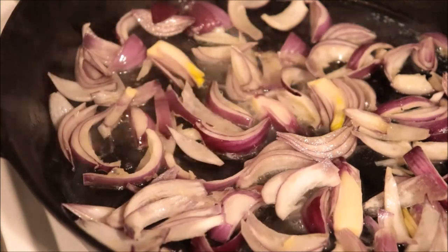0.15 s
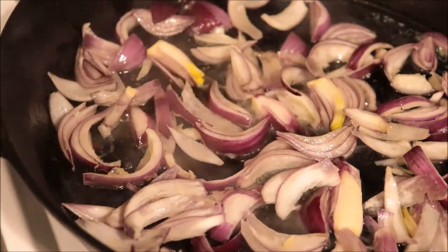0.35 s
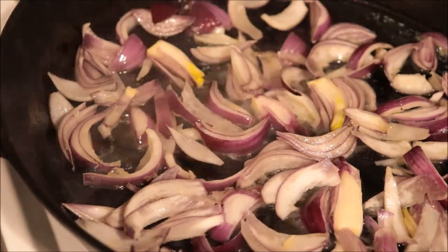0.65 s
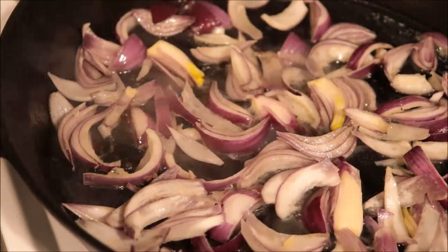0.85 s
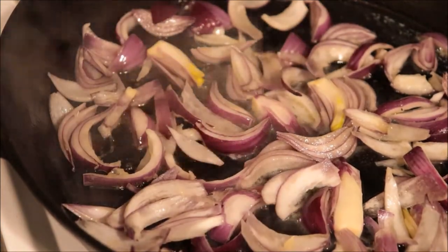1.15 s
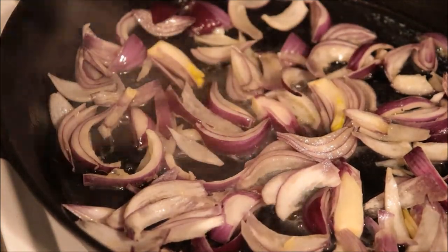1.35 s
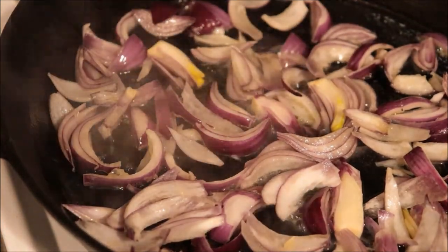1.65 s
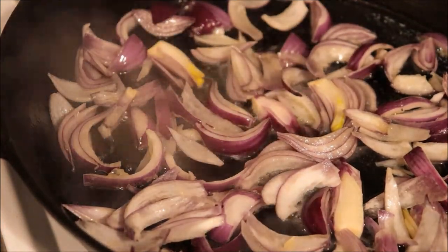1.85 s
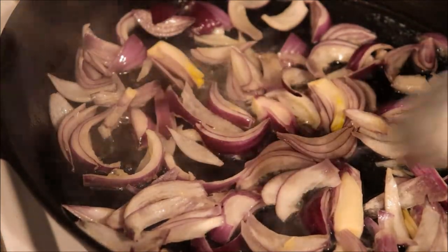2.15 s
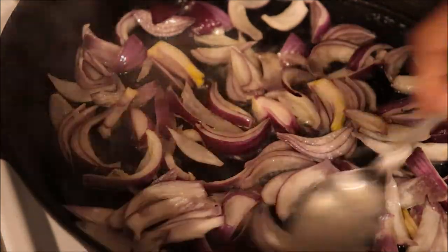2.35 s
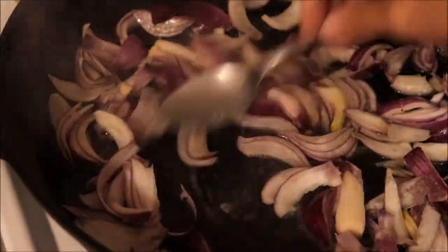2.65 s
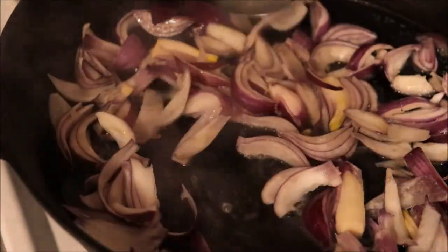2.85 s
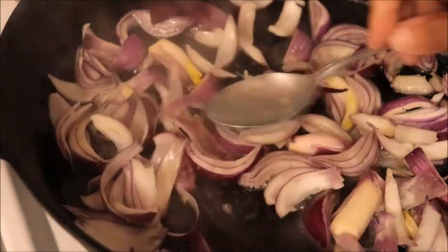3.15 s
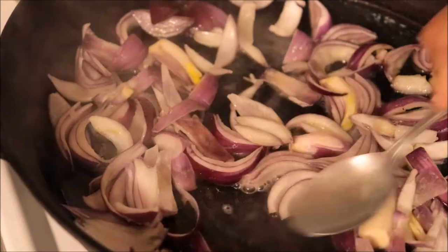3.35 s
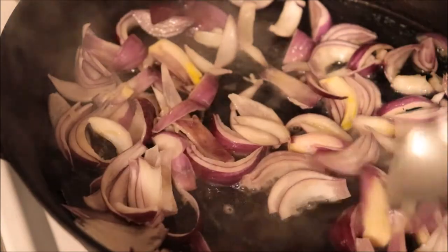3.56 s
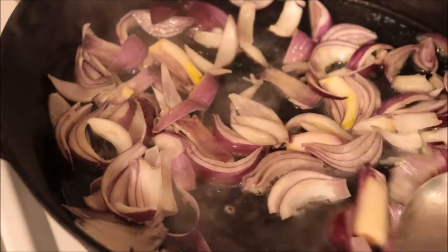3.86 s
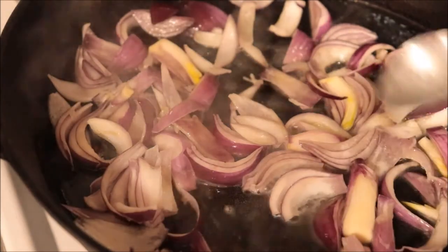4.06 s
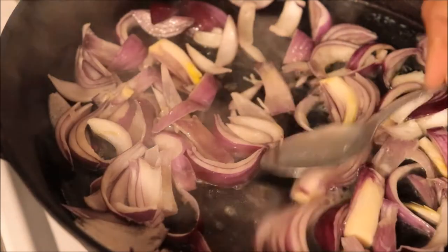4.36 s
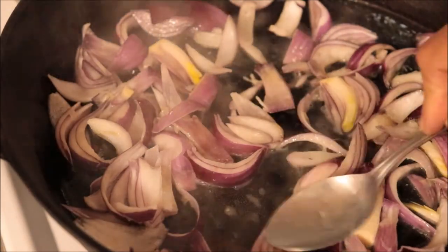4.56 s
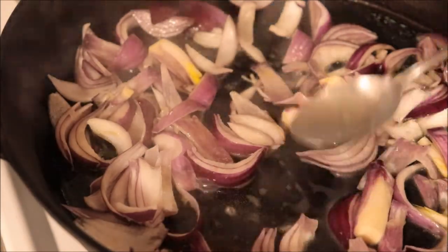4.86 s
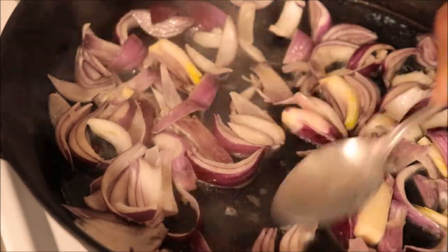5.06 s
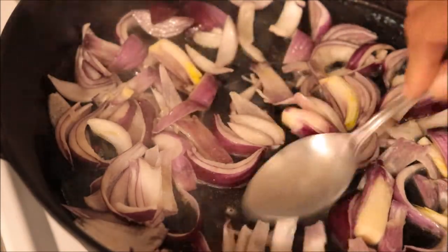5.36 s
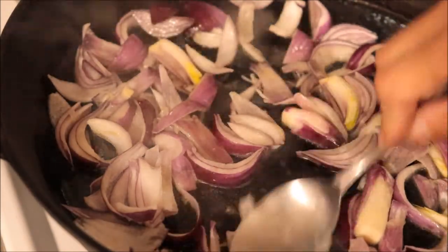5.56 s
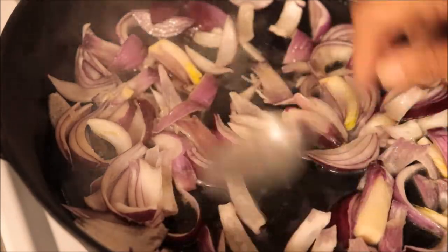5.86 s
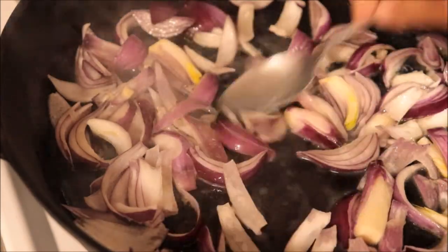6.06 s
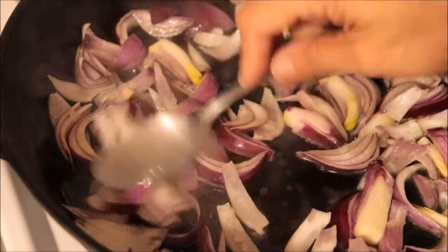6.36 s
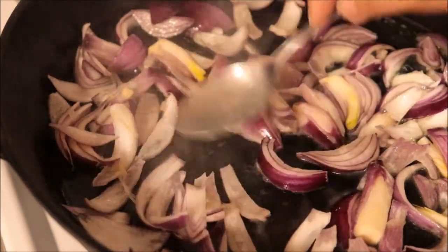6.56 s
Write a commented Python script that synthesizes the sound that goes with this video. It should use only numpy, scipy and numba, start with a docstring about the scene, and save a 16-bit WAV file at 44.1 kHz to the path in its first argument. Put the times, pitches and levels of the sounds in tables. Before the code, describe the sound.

Close, bright frying hiss with crackling oil pops and early dull bumps, gradually quieter, with light spoon knocks on the pan near the end.

```python
"""Sizzle: sliced onions fry in butter and oil, steam bubbles bursting as swarms of short damped sines.
Larger bursts pop with a thump; jets of steam are crowds of like-pitched bubbles.
The skillet's damped modes ring faintly under the sizzle and under a spoon's taps.
Dull knocks ring the microphone housing; wavering mains hum and filtered-noise rumble lie underneath.
One small microphone close above the skillet; gain control ducks loud peaks."""
import sys
import numpy as np
from scipy import signal
from scipy.fft import rfft, irfft
from scipy.io import wavfile
from scipy.ndimage import uniform_filter1d
from numba import njit

SR = 44100
rng = np.random.default_rng(int(sys.argv[2]) if len(sys.argv) > 2 else 0)


def to_wav(s):
    """Save 16-bit WAV."""
    ch = np.atleast_2d(s).T  # columns
    pcm = np.round(np.clip(ch, -1, 1) * 32767)  # PCM
    wavfile.write(sys.argv[1], SR, pcm.astype(np.int16))


N = 295470

# frying, flaring where the spoon turns wet slices onto the fat; shares are relative
# [start_s, sizzle_db, fine_spit_share_db, large_bubble_share_db, wet_hiss_share_db]
FRYING = [(0, -24, 3, 1.5, 3.5), (.35, -23.5, 1, 2, 3), (1.2, -24, 2, 2, 0), (1.8, -24, -1, -0.5, 2),
          (2.0, -25.5, 4, 3.5, 1.5), (2.42, -25.5, 1.5, 1.5, 1.5), (2.55, -23, -1, -0.5, 2),
          (2.7, -26, -2, 4.5, 0), (2.92, -27, -2, 0, -0.5), (2.98, -24, -4, 2.5, 0),
          (3.04, -25.5, -0.5, 1, -1), (3.1, -25, 0, 4.5, -4), (3.2, -25.5, 1, -2.5, -1),
          (3.6, -26, 2, 1.5, 1), (4.2, -28.5, 4, 3, 1.5), (5.2, -29.5, -1, 2, 1.5), (5.5, -32, 2.5, 3.5, 4),
          (5.95, -28.5, -0.5, 1, -4), (6.4, -28.5, -3.5, 1, -3), (6.7, -31, -0.5, 4.5, -2)]
# topmost treble relative to the rest of the spit [start_s, share_db]
MIST_SHARE = [(0, -9), (1.7, -5), (2.9, 2), (3.1, -5), (4.25, -12), (4.45, -4), (5.5, 1), (6.7, 4)]
# skillet bowl and microphone response together [freq_hz, gain_db]
SKILLET_COLOUR = [(88, -52), (150, -31), (275, -21.5), (600, -9.5), (950, -3.5), (1500, -7), (1850, -2.5),
                  (2700, 0), (3300, -5), (4300, -7), (5600, -7.5), (6500, -11), (9500, -18), (11300, -14),
                  (13200, -18), (15200, -22), (16000, -31)]
# skillet modes [freq_hz, middle_db, t60_s, edge_db]
SKILLET_MODES = [(177, -15, 0.028, -31), (444, -16, 0.24, -17.5), (943, -17, 0.13, -10),
                 (1825, 1.5, 0.055, -13), (1865, -20, 0.1, -5), (2300, -3, 0.072, -2), (2500, -20, .07, -6),
                 (2630, -8, 0.09, -9), (3320, 2, 0.04, -20), (3650, -28, 0.044, -4), (3940, -7, 0.05, -19),
                 (4500, -26, .05, -9), (5050, -2, 0.028, -18)]
# mains partials [freq_hz, level_db]
MAINS_PARTIALS = [(59.2, -60), (118.4, -66.5)]
# loudest jets of steam, each from one spot [centre_s, length_s, pitch_hz, rms_over_length_db]
JETS = [(0.015, 0.034, 2800, -31), (0.177, 0.018, 2750, -25), (0.329, 0.019, 2880, -21.5),
        (0.486, 0.018, 6820, -35), (0.621, 0.023, 1700, -32), (1.494, 0.029, 13300, -40),
        (1.721, 0.058, 9400, -35), (2.056, 0.039, 2400, -34), (2.587, 0.044, 4580, -29.5),
        (2.611, .05, 2680, -43), (2.977, 0.017, 2620, -35), (3.021, 0.032, 7040, -31),
        (3.291, 0.038, 2880, -36), (4.578, 0.037, 3300, -36), (4.791, 0.024, 3980, -31),
        (5.235, .015, 3020, -30), (5.867, 0.051, 3970, -41), (6.135, 0.037, 5570, -37),
        (6.425, 0.041, 3830, -31.5), (6.455, 0.052, 9600, -40.5)]
# loud single bursts, before colouring [start_s, strength_db, pitch_hz, cycles_to_minus_30_db, pocket_db]
LOUD_BURSTS = [(0.0196, -7, 3750, 5, -31), (0.1337, 5, 3800, 1, -30), (0.155, -5, 4070, 1, -3),
               (0.1756, -8, 4070, 5, 3), (0.184, 3, 6620, 6, 4), (0.257, 8, 10030, 2, -1),
               (0.207, -0.5, 7000, 12, -30), (0.3215, -11, 2300, 24, -20), (0.328, -14, 2700, 8, -32),
               (0.356, -16, 2270, 24, -30), (0.367, 8, 13000, 4, -33), (0.472, 20.5, 13230, 1.5, -25),
               (0.4926, 20, 10100, 2.5, 14.5), (0.552, 20, 11600, 5, -22), (0.59, 10, 5800, 1, -28),
               (0.631, 9.5, 6620, 2, -6), (0.697, -1, 2380, 4, -5), (1.03, 13, 7600, 0.5, -30),
               (1.04, 9, 9360, 2.5, -11), (1.173, 13, 6620, 1, 5.5), (0.9204, 2, 5000, 3, -9),
               (1.1973, 2, 5500, 3, -8), (1.2064, -14, 1880, 18, -20), (1.4322, -3, 5500, 9, -26),
               (1.5475, 2, 5000, 1.5, -30), (1.2512, 21, 5100, 1.4, 0.5), (1.3057, 1, 8730, 5, 1),
               (1.33, 2, 13000, 2, -30), (1.348, 3.5, 7600, 3, 3.5), (1.378, 12, 7560, 1.5, 6),
               (1.477, 11, 14180, 9, -9), (1.6685, 10, 8000, 3, -32), (1.7015, 12.5, 9360, 4.5, -35),
               (1.7211, 12, 5500, 1, -35), (1.7304, 8, 8500, 0, -30), (1.743, 7, 11500, 3, -32),
               (1.781, 6, 10750, 7, -3), (1.795, 7, 10750, 6, -30), (2.059, 1, 3090, 1.5, -30),
               (2.0683, 5, 12000, 4, -30), (2.1021, 13, 12350, 5, -4), (2.2917, 7, 8700, 4, -30),
               (2.4329, 9, 5760, 1, -6), (2.547, 5.5, 3500, 1.5, -30), (2.5495, 18, 9000, 0.5, -13),
               (2.5816, -5, 2600, 4, -20), (2.653, -4, 8500, 8, 1), (2.9747, 0, 11500, 3, -30),
               (3.0494, -9, 2340, 8, -30), (3.0863, 1.5, 2130, 3, -11), (3.2368, -8, 2550, 5, -7),
               (3.251, 2, 11000, 4, -30), (3.4184, 5, 12350, 12, -25), (3.758, -2, 1600, 1.5, -2.5),
               (3.778, -11, 2400, 5, -27), (3.8497, -3, 2310, 3.5, -2), (3.8505, 2, 3380, 13, -0.5),
               (3.85, -11, 5600, 11, -30), (4.2744, -2, 1870, 1.5, 7), (4.411, -5, 4000, 3, 2),
               (4.185, -9, 2600, 2, -30), (4.4125, 1, 12000, 3, -30), (4.4384, 2, 13000, 4, -30),
               (4.4958, -3, 4500, 2, -20), (4.511, 1, 13500, 4, -30), (4.5272, 2, 2880, 1, -23),
               (4.5655, -2, 2180, 2.5, -35), (4.577, 10, 14180, 6, -18), (4.5798, 12, 13230, 5, -7),
               (4.632, -6, 3500, 2.5, -27), (4.664, -9, 2000, 1, -23), (4.823, 2, 14000, 4, -30),
               (4.85, 0, 14000, 4, -30), (4.8769, 7, 13500, 5, -32), (4.865, -3, 5300, 4, -30),
               (4.8773, 4.5, 3460, 2, -0.5), (4.974, 7.5, 2950, 1, -12), (5.079, -12, 2600, 5, -23),
               (5.1726, 2, 5700, 7, -4), (5.1914, -6, 5370, 5, -9), (5.137, -8, 2700, 2, -30),
               (5.302, -8, 1800, 1, -9), (5.343, -5, 2000, 2, -18), (5.4626, -5, 8000, 3, -27),
               (5.5743, -4, 5000, 3.5, -30), (5.8068, 2, 12000, 5, -30), (5.8612, 22.5, 14300, 1.5, 2),
               (6.056, 0, 8000, 2, -39), (6.08, 2, 12400, 6, -39), (6.116, 10, 11520, 3.5, -5.5),
               (6.2467, -2, 4650, 3, -26), (6.274, -12, 2400, 7, -28), (6.283, -10, 2700, 5, -30),
               (6.2802, 2, 12000, 1, -30), (6.4, -6, 5000, -0.5, -30), (6.428, 10, 6620, -2.3, -20),
               (6.436, 4, 10800, 6, -30), (6.506, 1, 11700, 7, -30), (6.5247, 5, 11500, 4, -30),
               (6.5736, 6, 13230, 6, -30)]
# knocks on the housing [start_s, drive_db, rattle_s, contact_s, place_0_middle_1_edge]
HOUSING_KNOCKS = [(.153, -20, 0.0092, 0.0004, .5), (.1738, -12.5, 0.018, 0.00054, .1),
                  (.176, -3, 0.037, 0.0043, .1), (.180, -16, 0.011, 0.00027, .1),
                  (.19, -16, 0.081, 0.00058, .3), (.203, -11, 0.011, 0.003, 0.27),
                  (.207, -23.5, 0.016, .0004, .5), (.217, -24, 0.03, 0.00027, .5),
                  (.228, -20, 0.045, 0.00038, .3), (.2565, -19.5, 0.014, 0.0006, .2),
                  (.261, -14, 0.042, 0.0008, .2), (.29, -23, .012, 0.00098, 0.38),
                  (.266, -30, .006, .0003, .2), (.321, -25.5, 0.02, 0.00018, 0.11),
                  (.493, -15, 0.0055, 0.00051, 0.67), (1.2, -25, 0.046, 0.00055, 0.46),
                  (1.305, -12, 0.0076, 0.0012, .9), (1.311, -16.5, 0.024, 0.00071, .9),
                  (1.325, -21, .012, .0012, .9), (1.334, -21, 0.015, 0.0012, 0.79),
                  (1.348, -24, .02, 0.00025, 0.83), (1.358, -27, 0.0052, .001, .9),
                  (2.26, -26.5, 0.024, 0.00072, 0.61), (4.272, -25, 0.094, 0.00037, 0.41)]
# microphone housing modes [freq_hz, middle_db, t60_s, edge_db]
HOUSING_MODES = [(123, -13.5, 0.1, -30), (240, -30, 0.074, -10.5), (327, -18, 0.046, -11.5),
                 (473, 0, 0.026, -1), (586, -9, 0.033, -3), (680, 4.5, 0.02, -12), (870, -23, 0.04, 0),
                 (1020, 3, 0.035, -10), (1220, -5, 0.015, 7), (2300, 1, 0.035, -8)]
# spoon on the skillet [start_s, drive_db, scrape_s, contact_s, place_0_middle_1_edge]
SPOON_TAPS = [(4.526, -18.5, 0.0062, 0.0011, .1), (5.2, -16, 0.03, 0.0033, .1),
              (5.765, -19, 0.026, 0.0028, .1), (6.116, -21, 0.008, 0.0002, .5),
              (6.145, -25, .005, .0002, .6), (6.242, -29, .008, .00015, .8),
              (6.468, -14, 0.019, 0.00076, .1), (6.5245, -19, 0.017, 0.00015, .9),
              (6.529, -20, 0.011, 0.00013, 1), (6.539, -18, 0.012, 0.00013, .9),
              (6.546, -22.5, .015, 0.00017, 0.99), (6.574, -26, 0.0073, .00015, 0.8)]

LOUDEST_SPREADS = 4.5  # cap on a swarm bubble's strength, in spreads
RUMBLE_DB = -61
# random lesser events: level relative to the sizzle, rising with pitch
LESSER_LO_HZ, LESSER_OCTAVES = 1910, 2.55
LESSER_BURST_DB, LESSER_BURST_DB_PER_OCTAVE, LESSER_BURST_CYCLES = 11.5, 3.5, 4.
LESSER_JET_DB, LESSER_JET_DB_PER_OCTAVE, LESSER_JET_S = -13.5, 2.5, .03
POCKET_HZ, POCKET_CYCLES = 960, 1.4  # hollow under an onion slice that a burst empties
# weaker bursts behind the first
TEAR_S, TEAR_DB, TEAR_FADE_DB, TEAR_PITCH_SPREAD = .003, -9, 9, .2
FIRST_BLOW = .7  # strength of the first contact against the rattle after it
LIMIT_DB, LIMIT_RATIO, LIMIT_ATTACK_S, LIMIT_RELEASE_S = -10, 3.4, 0.0012, 0.046
TOP_HZ = 16000


def undb(db):
    """Decibels to amplitude ratio."""
    return 10 ** (np.asarray(db) / 20)


def level(x, rms_db):
    """Scale x to the given rms."""
    return x * undb(rms_db) / np.sqrt(np.mean(x ** 2))


def walk(rate_hz):
    """Random levels held 1 / rate_hz s and smoothed twice; spread near 1."""
    hold = int(SR / rate_hz)
    steps = np.repeat(rng.standard_normal(N // hold + 1), hold)
    return 0.77 * uniform_filter1d(uniform_filter1d(steps, hold), hold)[:N]


def flicker(rate_hz):
    """Quick random swings: a walk with its slow drift taken out."""
    x = walk(rate_hz)
    return x - uniform_filter1d(x, SR // 6)


@njit
def bubbles(start, size, hz, cycles, glide, length):
    """Damped sines, 30 dB down after cycles; pitch rises by the fraction glide in that time."""
    y = np.zeros(length)
    for k in range(len(start)):
        span = cycles[k] * SR / hz[k]
        step = np.exp(2j * np.pi * hz[k] / SR - np.log(1000) / (2 * span))
        turn = np.exp(2j * np.pi * hz[k] / SR * glide / span)
        z = size[k] + 0j
        for i in range(start[k], min(start[k] + int(1.6 * span) + 1, length)):
            z *= step
            step *= turn
            y[i] += z.imag
    return y


def swarm(count, lo_hz, hi_hz, spread_db, cycles, gust_db, gust_rate_hz):
    """Bubbles at random times, pitch even over the octaves, a few much louder; gusts at unit rms."""
    when, pitch, strength, sign = rng.random((count, 4)).T
    hz = lo_hz * (hi_hz / lo_hz) ** pitch
    strength_db = np.minimum(-spread_db * np.log(1 - strength), LOUDEST_SPREADS * spread_db)
    # small bubbles ring briefly: strength grows with pitch to keep the swarm white
    size = hz * undb(strength_db) * np.sign(sign - .5)
    x = bubbles((when * N).astype(np.int64), size, hz, np.full(count, 1. * cycles), 0.074, N)
    return level(x * undb(gust_db * flicker(gust_rate_hz)), 0)


def colour(x, points):
    """Causal filter of the given (Hz, dB) shape, from the folded cepstrum of the log gain."""
    hz, db = np.transpose(points)
    grid_hz = np.arange(1025) * SR / 2048
    log_gain = np.interp(np.log(grid_hz + 1), np.log(hz), db) * np.log(10) / 20
    ceps = irfft(log_gain)
    ceps[1:1024] *= 2
    ceps[1025:] = 0
    return signal.fftconvolve(x, irfft(np.exp(rfft(ceps))))[:N]


def ring(x, modes, edge=False):
    """Sum of damped modes driven by x in the middle or at the edge; none passes a steady push."""
    out = 0
    for hz, middle_db, t60_s, edge_db in modes:
        r = 10 ** (-3 / (t60_s * SR))
        poles = [1, -2 * r * np.cos(2 * np.pi * hz / SR), r * r]
        out = out + undb(edge_db if edge else middle_db) * signal.lfilter([1, -1], poles, x)
    return out


def sizzle():
    """Bubble swarms of several sizes follow the frying and keep the skillet faintly ringing."""
    t = np.arange(N) / SR
    s, *columns = np.transpose(FRYING)
    fry_db, spit_db, large_db, wet_db = (np.interp(t, s, c) for c in columns)
    large = swarm(12000, 209, 1395, spread_db=1.0, cycles=5.9, gust_db=3.5, gust_rate_hz=22)
    middle = swarm(40000, 1674, 3590, spread_db=2.0, cycles=5.8, gust_db=2.2, gust_rate_hz=23)
    wet = swarm(60000, 4040, 6940, spread_db=2.0, cycles=4.0, gust_db=1.9, gust_rate_hz=25)
    spit = swarm(90000, 7530, 17000, spread_db=3.0, cycles=2.84, gust_db=2.1, gust_rate_hz=16)
    mist = swarm(30000, 12500, 16600, spread_db=3.5, cycles=5.1, gust_db=9, gust_rate_hz=16)
    spit = spit + undb(np.interp(t, *np.transpose(MIST_SHARE)) - 6.0) * mist
    # rounder bubbles ring for many cycles: fleeting whistles
    ringing = swarm(9000, 698.0, 13020, spread_db=3.0, cycles=70, gust_db=6.0, gust_rate_hz=14.0)
    # droplets of fat: sharp clicks across the treble
    crackle = swarm(2000, 3500, 14000, spread_db=4.0, cycles=0.75, gust_db=5, gust_rate_hz=25)
    # tiny pops of oil
    ticks = swarm(1500, 1520, 5490, spread_db=2.0, cycles=12.0, gust_db=19, gust_rate_hz=10)
    # rarer, lower snaps
    snaps = swarm(700, 1180, 5960, spread_db=4, cycles=.8, gust_db=3.5, gust_rate_hz=24)
    mix = undb(-14) * snaps + undb(-12.5) * ticks + undb(-6) * ringing + undb(-9.5) * crackle
    mix = mix + undb(large_db - 8.5) * large + undb(-5.5) * middle + undb(wet_db - 6.0) * wet
    mix = mix + undb(spit_db + 1.7 * flicker(12)) * spit
    # the whole pan surges together
    mix = mix * undb(0.5 * flicker(18))
    direct = level(colour(mix, SKILLET_COLOUR), 0.3)
    # all bubbles drive the skillet, the large ones also on their own
    skillet = level(ring(mix, SKILLET_MODES), -18.5) + level(ring(large, SKILLET_MODES), -33.0)
    return undb(fry_db) * (direct + skillet)


def hum():
    """Mains sines, wavering in level, over band-limited low kitchen rumble."""
    t = np.arange(N) / SR
    tones = 0
    for hz, db in MAINS_PARTIALS:
        tones = tones + np.sqrt(2) * undb(db + 2.3 * walk(12)) * np.sin(2 * np.pi * hz * t)
    band = signal.butter(1, [15, 150], "bandpass", fs=SR, output="sos")
    rumble = signal.sosfilt(band, rng.standard_normal(N))
    return tones + level(rumble, RUMBLE_DB)


def lesser(count, db, db_per_octave):
    """Random (start_s, level_db, pitch_hz) of small events that follow the frying level."""
    when, pitch = rng.random((count, 2)).T
    s, octaves = when * (N - 1) / SR, pitch * LESSER_OCTAVES
    fry_db = np.interp(s, *np.transpose(FRYING)[:2])
    return s, fry_db + db + db_per_octave * octaves, LESSER_LO_HZ * 2 ** octaves


def steam_jets():
    """Each jet is a crowd of like-sized bubbles that swells and fades."""
    room, crowd = 8000, 120  # samples per jet, bubbles per jet
    out = np.zeros(N + room)
    small = lesser(20, LESSER_JET_DB, LESSER_JET_DB_PER_OCTAVE)
    small_jets = [(s, LESSER_JET_S, hz, db) for s, db, hz in zip(*small)]
    for s, length_s, hz, db in [*JETS, *small_jets]:
        when, pitch = rng.standard_normal((crowd, 2)).T
        start = np.clip(room / 2 + when * length_s * .4 * SR, 0, room - 1).astype(np.int64)
        size = undb(5.1 * rng.standard_normal(crowd)) * (-1.) ** np.arange(crowd)
        pitch_hz = np.minimum(hz * np.exp(.14 * pitch), 15500)
        jet = bubbles(start, size, pitch_hz, np.full(crowd, 7.), 0.032, room)
        i = int(s * SR)
        out[i:i + room] += jet * undb(db) * np.sqrt(length_s * SR / np.sum(jet ** 2))
    return out[room // 2:room // 2 + N]


def pops():
    """Bursts: a damped bubble and the thump of its pocket, heard through the skillet colour."""
    s, db, hz, cycles, pocket_db = np.transpose(LOUD_BURSTS)
    one = np.ones(len(s))
    start = (s * SR).astype(np.int64)
    thumps = bubbles(start, -undb(pocket_db), POCKET_HZ * one, POCKET_CYCLES * one, 0., N)
    small = lesser(24, LESSER_BURST_DB, LESSER_BURST_DB_PER_OCTAVE)
    s, db, hz = np.hstack([[s, db, hz], small])
    cycles = np.append(cycles, np.full(len(small[0]), LESSER_BURST_CYCLES))
    cycles = np.clip(cycles, .7, 30)
    start = (s * SR).astype(np.int64)
    x = thumps + bubbles(start, undb(db) * -1, hz, cycles, 0., N)
    # the film does not tear at once: four weaker bursts crowd in behind each first
    for late, pitch, sign in rng.random((len(s), 4, 3)).transpose(1, 2, 0):
        after = start + (late * TEAR_S * SR).astype(np.int64) + 4
        size = undb(db + TEAR_DB - TEAR_FADE_DB * late) * np.sign(sign - .5)
        tear_hz = hz * (1 + TEAR_PITCH_SPREAD * (pitch - .5))
        x = x + bubbles(after, size, tear_hz, cycles, 0., N)
    return colour(x, SKILLET_COLOUR)


def strikes(rows, modes, grit_db):
    """Short rough pushes; softer contact drives fewer high modes, place picks which ones ring."""
    room = 4000
    force, t = np.zeros((2, N + room)), np.arange(room) / SR
    for s, db, rattle_s, contact_s, place in rows:
        push = rng.standard_normal(room) * np.exp(-3 * t / rattle_s)
        push[0] = FIRST_BLOW * np.sqrt(np.sum(push ** 2))
        push = push / np.sqrt(np.sum(push ** 2))
        soft = np.exp(-t[:400] / max(contact_s / 3, 1e-5))
        blow = undb(db) * np.convolve(push, soft / soft.sum())[:room]
        i, place = int(s * SR), np.clip(place, 0, 1)
        force[:, i:i + room] += np.outer([1 - place, place], blow)
    middle, edge = force[:, :N]
    # the rubbing itself, a gritty scrape
    grit = undb(grit_db) * colour(middle + edge, SKILLET_COLOUR)
    return ring(middle, modes) + ring(edge, modes, edge=True) + grit


def housing_knocks():
    """Knocks excite the damped modes of the microphone housing."""
    return strikes(HOUSING_KNOCKS, HOUSING_MODES, grit_db=16)


def spoon_taps():
    """Spoon taps and scrapes excite the damped modes of the skillet."""
    return strikes(SPOON_TAPS, SKILLET_MODES, grit_db=23)


@njit
def follow(x, attack, release):
    """Envelope that rises fast and falls slowly."""
    e, y = 0., np.empty(len(x))
    for i in range(len(x)):
        e += (abs(x[i]) - e) * (attack if abs(x[i]) > e else release)
        y[i] = e
    return y


def scene():
    """All sources summed, the same in both channels."""
    mono = sizzle() + hum() + steam_jets() + pops() + housing_knocks() + spoon_taps()
    return np.array([mono, mono])


def record(dry):
    """Gain control ducks after loud peaks; the top is cut steeply."""
    envelope = follow(dry[0], 1 / (LIMIT_ATTACK_S * SR), 1 / (LIMIT_RELEASE_S * SR))
    gain = np.maximum(envelope / undb(LIMIT_DB), 1) ** (1 / LIMIT_RATIO - 1)
    low_pass = signal.ellip(12, .2, 90, TOP_HZ, fs=SR, output="sos")
    return signal.sosfilt(low_pass, np.clip(dry * gain, -1, 1))


dry = scene()
out = record(dry)
to_wav(out)
```